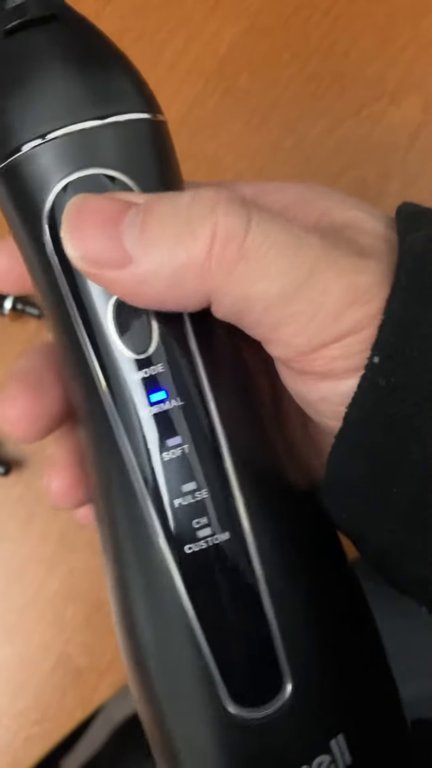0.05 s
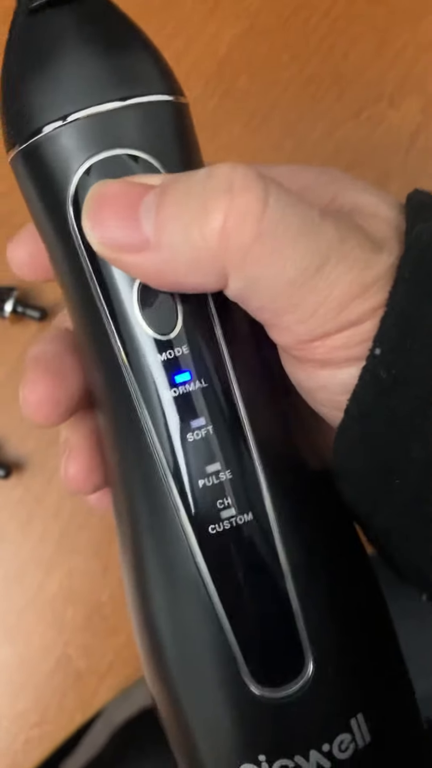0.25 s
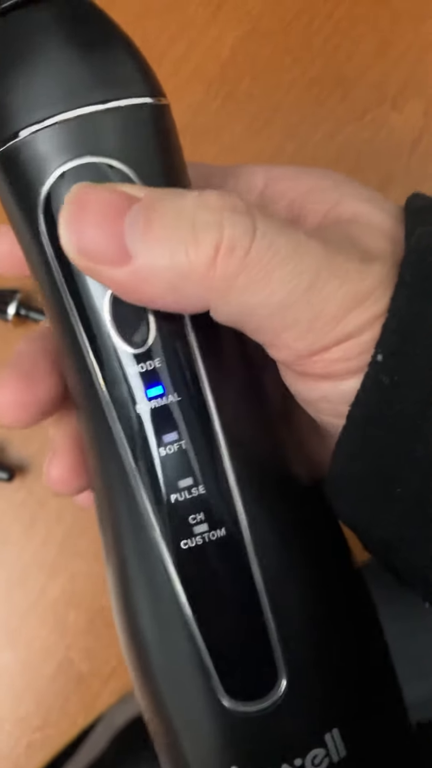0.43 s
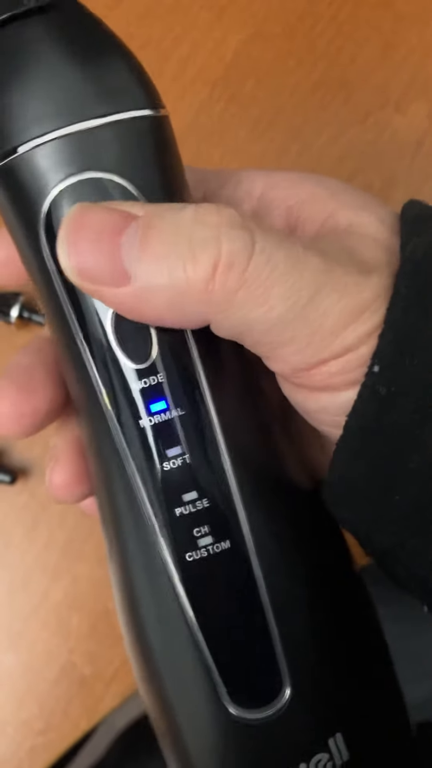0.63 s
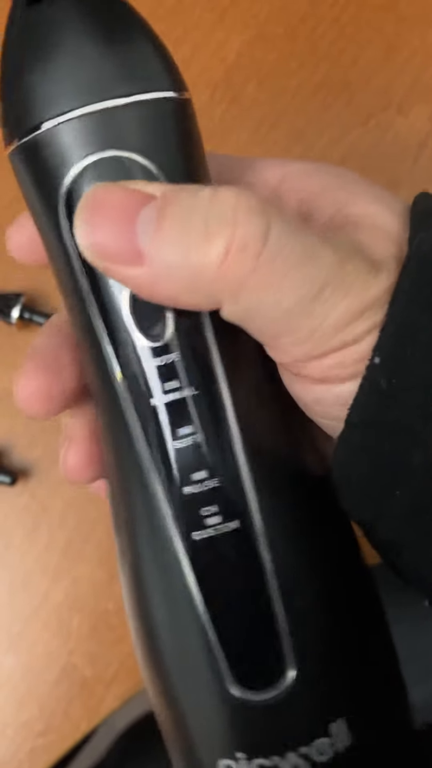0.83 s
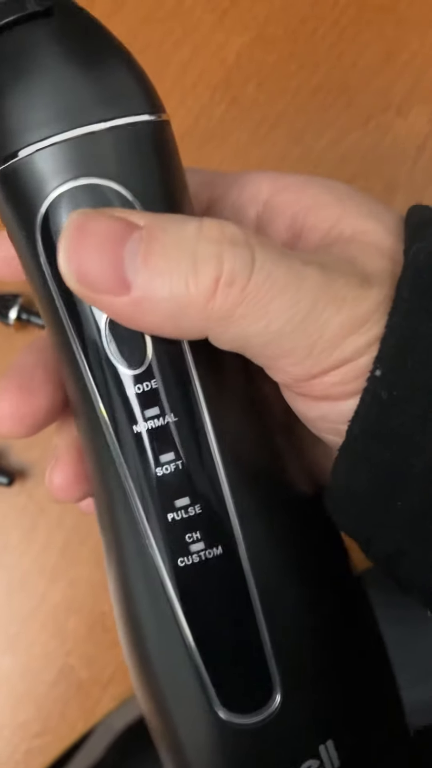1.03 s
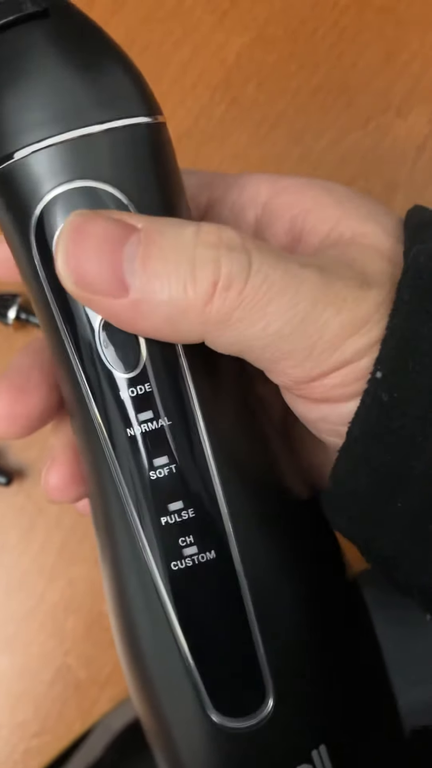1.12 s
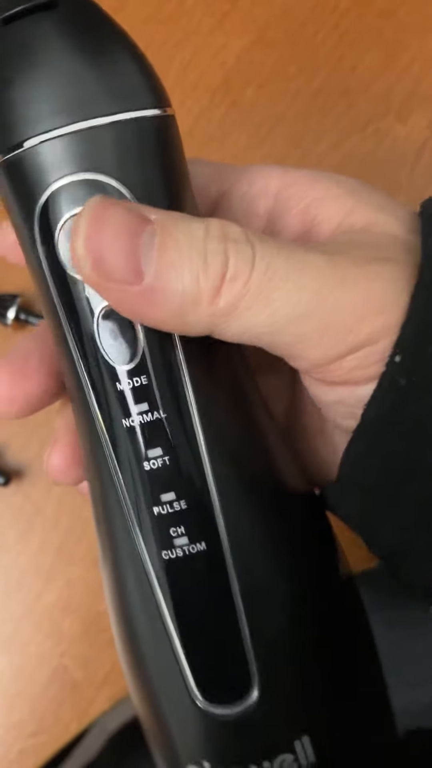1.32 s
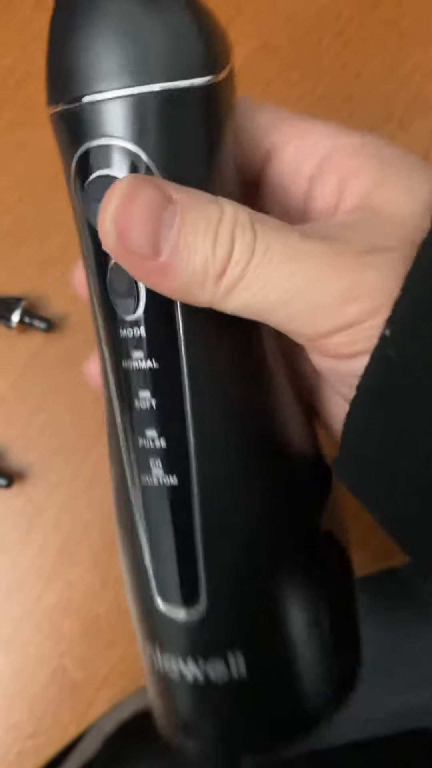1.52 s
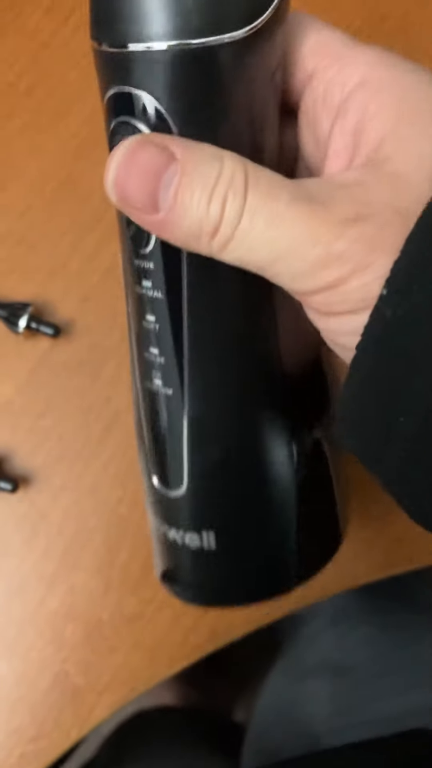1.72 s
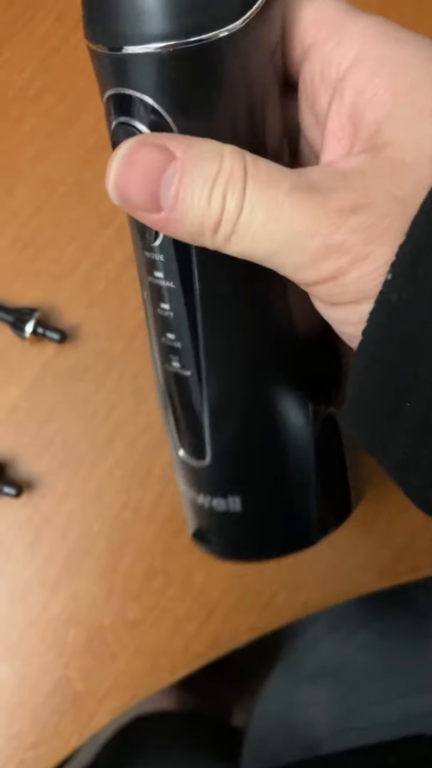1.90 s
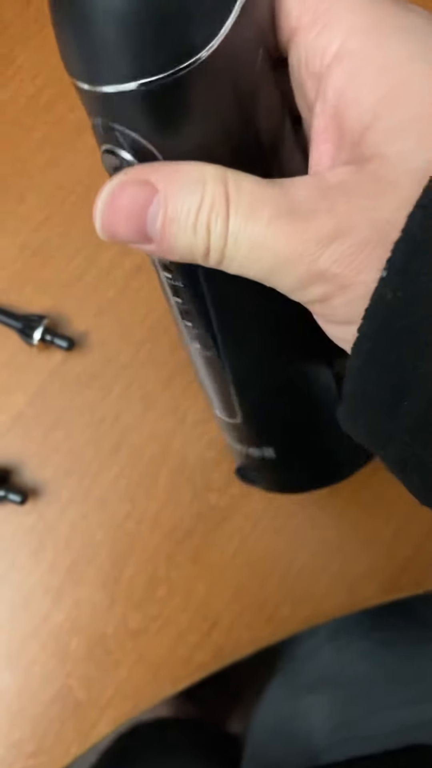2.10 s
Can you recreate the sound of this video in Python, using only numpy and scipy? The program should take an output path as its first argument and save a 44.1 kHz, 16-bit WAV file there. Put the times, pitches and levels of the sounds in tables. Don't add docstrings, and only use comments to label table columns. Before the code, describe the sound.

A handheld dental water jet runs dry close to the microphone: button clicks, an abrupt harsh gear rattle with a thin whine, a quick coast to rest, then low grip thumps in a quiet room.

```python
import sys
import numpy as np
from scipy import signal
from scipy.fft import rfft, irfft, next_fast_len
from scipy.io import wavfile
from scipy.ndimage import uniform_filter1d, map_coordinates

SR = 44100
rng = np.random.default_rng(int(sys.argv[2]) if len(sys.argv) > 2 else 0)


def master_out(mix):
    frames = np.transpose(np.atleast_2d(mix))
    ceiling = np.clip(frames, -1, 1)
    pcm = np.round(ceiling * 32767).astype(np.int16)
    wavfile.write(sys.argv[1], SR, pcm)


def volts(x):
    e = np.asarray(x, float) / 20
    return 10 ** e


N = 94815

SHAFT_HZ, OFF_S, ON_S = 154.9, 0.8, 0.215
PINION, CROWN = 10, 46

# frequency in Hz, lead of the left in radians.
DEVICE_LEAD = [(250, 0), (1000, -1.5), (2200, .7), (3600, -3), (4200, .5), (4750, 2.8), (5500, 3.3),
               (14800, 12.6)]
# frequency in Hz, left over right in dB.
DEVICE_PAN = [(300, -2.5), (700, -3.5), (1300, -4), (2400, -7.5), (2900, -1.5), (4400, 0), (5200, 2)]
# frequency in Hz, likeness from 0 to 1.
DEVICE_ALIKE = [(500, .95), (1400, .8), (2500, .68), (3500, .6), (4800, .9), (8500, .92), (10000, .75),
                (14000, .7)]


def unit(x):
    return x / np.sqrt(np.mean(x ** 2) + 1e-20)


def along(points, hz):
    f, v = np.transpose(points)
    return np.interp(np.log(hz + 1), np.log(f + 1), v)


def wobble(rate):
    return map_coordinates(rng.standard_normal(int(N * rate / SR) + 4), [np.arange(N) * rate / SR])


def filtered(x, response):
    m = next_fast_len(N + SR // 2)
    return irfft(rfft(x, m) * response(np.fft.rfftfreq(m, 1 / SR)), m)[..., :N]


def causal(gain_db):
    def response(hz):
        cepstrum = irfft(gain_db(hz) * np.log(10) / 20)
        half = len(cepstrum) // 2
        cepstrum[1:half] *= 2
        cepstrum[half + 1:] = 0
        return np.exp(rfft(cepstrum))
    return response


def ports(pair, lead, alike, pan):
    def response(hz):
        angle = np.arccos(np.clip(along(alike, hz), 0, 1)) / 2
        phase = np.interp(hz, *np.transpose(lead))
        gap = volts(along(pan, hz) / 2) * np.exp(0.5j * phase)
        left = [np.cos(angle) * gap, np.sin(angle) * gap]
        right = [np.cos(angle) / gap, -np.sin(angle) / gap]
        return np.array([left, right])
    return filtered(pair, response).sum(axis=1)


def breeze():
    # frequency in Hz, density in dB per Hz.
    air_tilt = [(25, -25.5), (60, -6.5), (200, -13), (700, -18.5), (830, -31), (1350, -18), (3000, -36),
                (15000, -49.5)]
    patch_db, level_db = 2.5, -64.5
    z = signal.stft(rng.standard_normal((2, N)), nperseg=512)[2]
    patches = uniform_filter1d(rng.standard_normal(z.shape[1:]), size=4, axis=0)
    patches = uniform_filter1d(patches, size=14, axis=1)
    noise = signal.istft(z * volts(patch_db * unit(patches)), nperseg=512)[1][:, :N]
    noise = unit(filtered(noise, lambda hz: volts(along(air_tilt, hz))))
    return noise * volts(level_db + 0.25 * wobble(4.8))


def hum():
    # frequency in Hz, rms level in dB.
    hum_tones = [(59.2, -63.5), (118.4, -76), (296.1, -70.5), (349.9, -66.5), (506.0, -78), (694.4, -75.5),
                 (1109, -85.5), (1324, -76.5)]
    sway_db, drift_rad = 3.5, 1.7
    t = np.arange(N) / SR
    out = np.zeros((2, N))
    for hz, db in hum_tones:
        sway = sway_db * np.array([wobble(12.12), wobble(22)])
        tone = np.sin(2 * np.pi * hz * t + drift_rad * wobble(5.96))
        out += np.sqrt(2) * volts(db + sway) * tone
    return out


def rustles():
    tilt = [(1500, -22), (3000, 10), (9000, 1.0), (11000, -1.5), (14000, -18.5)]  # Hz, dB
    t = np.arange(N) / SR
    hiss = filtered(rng.standard_normal((2, N)), lambda hz: volts(along(tilt, hz)))
    thumb = volts(-70) * np.exp(-0.5 * ((t - 0.18) / 0.02) ** 2)
    sleeve = volts(-82) * np.exp(-0.5 * ((t - 1.59) / 0.045) ** 2)
    return hiss * (thumb + sleeve)


def air():
    # frequency in Hz, lead of the left in radians.
    air_lead = [(300, 0), (950, -2.6), (3500, -3.3), (5500, -3.14), (8500, 0), (14900, 6.3)]
    # frequency in Hz, likeness from 0 to 1.
    air_alike = [(60, .97), (300, .85), (1400, .5), (3000, .6), (5500, .72), (12000, .55)]
    return ports(breeze() + hum() + rustles(), air_lead, air_alike, [(400, 1.0), (800, -1.4)])


def hand():
    # start in seconds, length in seconds, frequency in Hz, peak level in dB.
    thump_events = [(.955, .08, 126, -53), (1.112, .075, 127, -48), (1.225, .045, 124, -46),
                    (1.262, .068, 126, -36), (1.215, .05, 66, -52), (1.28, .07, 63, -47),
                    (1.15, .05, 64, -54), (1.878, .065, 124, -40), (1.88, .055, 72, -43),
                    (1.94, .06, 52, -44), (2.02, .05, 110, -56), (.13, .06, 68, -58)]
    stretch, skew, softness = 1.2, 0.8, 1.8
    scuff_db, scuff_hz, pan_db = -17, 260, 2.4
    t = np.arange(N) / SR
    thump = np.zeros(N)
    for start, length, hz, db in thump_events:
        progress = np.clip((t - start) / (length * stretch), 0, 1)
        swell = np.abs(np.sin(np.pi * progress ** skew)) ** softness
        thump += volts(db) * swell * np.sin(2 * np.pi * hz * (t - start))
    scuff = unit(filtered(rng.standard_normal((2, N)), lambda hz: hz / (1 + (hz / scuff_hz) ** 4)))
    loudness = np.sqrt(np.abs(uniform_filter1d(thump ** 2, size=900)))
    both = thump + volts(scuff_db) * scuff * loudness
    return both * volts([[pan_db / 2], [-pan_db / 2]])


def clicks():
    # time in seconds, peak level in dB, low body in dB, treble snap in dB.
    click_events = [(0.1572, -35, -3.5, -15), (0.1935, -39, -19, -20), (0.2174, -37, -17, -27),
                    (0.2248, -34, -15, -12.5), (0.2303, -27.5, -31.5, -2.5), (1.349, -57.5, -16, 10),
                    (1.5554, -74, 1, -16), (1.7904, -69, -10.5, 6), (1.823, -69, -8, 6.5),
                    (1.938, -53, -20, -20.5), (2.0567, -59, -11, -27)]
    # frequency in Hz, level in dB, 60 dB decay in seconds.
    button_modes = [(465, -6, 0.035), (865, -0.5, 0.035), (1230, -9, 0.012), (2160, -10, 0.011),
                    (3400, -13, .007), (4400, -10, 0.01), (7900, -5, .009), (8900, -5, 0.008)]
    crack_db, crack_t60_s, rise_s, crack_hz = -1, 0.01, 0.0012, 10500
    out = np.zeros((2, N + SR))
    t = np.arange(SR // 8) / SR
    for start, db, body_db, snap_db in click_events:
        tilt = [(700, body_db), (2500, 0), (8000, snap_db)]
        ring = np.zeros((2, len(t)))
        for hz, level, t60 in button_modes:
            mode_db = level + along(tilt, hz) + rng.normal(0, 0.57, (2, 1))
            ring += volts(mode_db - 60 * t / t60) * np.sin(2 * np.pi * hz * t)
        body = volts(body_db / 2) * uniform_filter1d(rng.standard_normal((2, len(t))), size=5)
        snap = volts(snap_db) * np.diff(rng.standard_normal((2, len(t) + 2)), 2) / 3
        crack = volts(crack_db - 60 * t / crack_t60_s) * (body + snap)
        click = ring * (1 - np.exp(-t / rise_s)) + crack
        out[:, round(start * SR):][:, :len(t)] += volts(db + 4.5) * click

    def band(hz):
        return 1 / (1 + (hz / crack_hz) ** 6) / (1 + (300 / (hz + 1)) ** 4)
    return ports(filtered(out[:, :N], band), DEVICE_LEAD, DEVICE_ALIKE, DEVICE_PAN)


def pump_load(turns):
    stroke_db, return_db, width = 0, 0.8, 0.11
    eccentric_db, wander_db = 2, 1.1
    crank = turns * PINION / CROWN

    def bump(at):
        return np.exp(-0.5 * (((crank - at + 0.5) % 1 - 0.5) / width) ** 2)
    tooth = (turns * PINION).astype(int) % PINION
    eccentric = eccentric_db * unit(rng.standard_normal(PINION))[tooth]
    strokes = stroke_db * bump(0.88) + return_db * bump(0.26)
    return volts(strokes + wander_db * wobble(71.16) + eccentric)


def tooth_knocks(turns):
    pinion_wear_db, crown_wear_db, scatter_db, cap = -5, -4, 4, 2.3
    tooth = np.arange(int(turns[-1] * PINION))
    at = np.interp(tooth, turns * PINION, np.arange(N)).astype(int)
    pinion_wear = volts(pinion_wear_db) * rng.standard_normal((2, PINION))[:, tooth % PINION]
    crown_wear = volts(crown_wear_db) * rng.standard_normal((2, CROWN))[:, tooth % CROWN]
    heavy = np.minimum(rng.exponential(1, 2000), cap)[tooth]
    sign = np.sign(rng.standard_normal((2, 2000)))[:, tooth]
    size = pinion_wear + crown_wear + unit(volts(scatter_db * heavy)) * sign
    knocks = np.array([np.bincount(at, row, N) for row in size])
    return knocks * np.sqrt(SR / (SHAFT_HZ * PINION))


def slams(t, level_db):
    # time in seconds, peak level in dB.
    slam_events = [(0.2299, -24), (0.2449, -27.5), (0.2536, -22), (0.2646, -26.5), (0.2719, -25),
                   (0.2872, -24.3), (0.293, -18), (0.3064, -27), (0.3229, -22), (0.3427, -20.5),
                   (0.3491, -17.5), (0.3622, -22.5), (0.3679, -26), (0.3815, -20.5), (0.4071, -25.5),
                   (0.4138, -27), (0.4227, -25), (0.4344, -30.5), (0.4423, -18), (0.4661, -23.5),
                   (0.4811, -20), (0.5005, -17.5), (0.5126, -25), (0.5301, -17), (0.5713, -23.5),
                   (0.5902, -18.5), (0.6013, -24.5), (0.6074, -22), (0.6157, -24), (0.6528, -25),
                   (0.658, -30), (0.681, -25.5), (0.6904, -33), (0.7087, -26), (0.7396, -21),
                   (0.746, -32.5), (0.771, -25.5), (0.7779, -21), (0.8001, -19), (0.8088, -29.5),
                   (0.8144, -32.5), (0.8335, -21), (0.8407, -30), (0.8532, -33.5), (0.8626, -26.5),
                   (0.8786, -29), (0.8865, -23), (0.8943, -28), (0.9254, -32), (0.9515, -31), (0.961, -25),
                   (0.9866, -38), (0.995, -29.5), (1.0065, -34), (1.0273, -39.5), (1.0394, -36.5),
                   (1.047, -45), (1.0574, -39), (1.065, -39), (1.0837, -49.5)]
    gain_db, decay_s, rise_s = 2.5, 0.0028, 0.0004
    out = np.zeros(N)
    for start, db in slam_events:
        shape = np.exp(-np.abs(t - start) / np.where(t > start, decay_s, rise_s))
        out += volts(db + gain_db - np.interp(start, t, level_db)) * shape
    return out


def rattle(t, turns, speed, level_db):
    # frequency in Hz, width in Hz, gain in dB.
    housing_modes = [(872, 110, 9), (1364, 53, 9), (1577, 105, 14.5), (1872, 300, 11), (2258, 220, 11),
                     (2659, 89, 12), (3092, 140, 11), (3482, 300, 11), (4700, 1000, 2), (5915, 1200, 1.5),
                     (6470, 21, 0.5), (7960, 110, 4), (8310, 190, -19), (9020, 810, 7)]
    # frequency in Hz, density in dB per Hz.
    shell_tilt = [(150, -28.5), (650, -20.5), (850, -7.5), (2000, -9), (2700, -15), (5300, -7.5),
                  (7200, -6.5), (10800, -22)]
    rub_db, trim_db, dull_hz = 0, 1, 11500
    slam_coast_db, slam_treble_db, slam_top_hz = 3, -6, 4800

    def slam_tone(hz):
        treble = volts(slam_treble_db)
        return treble + (1 - treble) / (1 + 1j * (hz / slam_top_hz) ** 2)

    def body_db(hz):
        modes = sum(db / (1 + (2 * (hz - centre) / width) ** 2) for centre, width, db in housing_modes)
        return along(shell_tilt, hz) + modes

    load = pump_load(turns)
    rub = rng.standard_normal((2, N))
    drive = (tooth_knocks(turns) + volts(rub_db) * rub) * load / load.mean() * speed ** 0.3
    slam_noise = np.sign(rub) * slams(t, level_db) * volts(-slam_coast_db * (1 - speed))
    drive = drive + filtered(slam_noise, slam_tone)
    colour = causal(body_db)
    scale = np.std(filtered(drive, colour)[:, :int(OFF_S * SR)])
    out = filtered(drive * volts(level_db + trim_db), colour) / scale
    return out - (1 - speed ** 0.77) * filtered(out, lambda hz: hz > dull_hz)


def whine(t, turns, speed, level_db):
    # shaft order, level in dB.
    whine_orders = [(1, -61), (2, -68.5), (3, -51.5), (7, -49), (8, -48.5), (9, -53.5), (10, -34.5),
                    (12, -45), (17, -46), (20, -53), (48, -49.5), (51, -52), (54, -59), (57, -56.5),
                    (59, -50.5), (60, -56), (61, -52.5), (62, -58)]
    spin_up_s, rise_s, sway_db, drift_rad = 0.009, 0.04, 3.2, 0.45
    since_on = np.maximum(t - ON_S, 0)
    spun = turns - SHAFT_HZ * spin_up_s * (1 - np.exp(-since_on / spin_up_s))
    out = np.zeros((2, N))
    for order, db in whine_orders:
        sway = sway_db * np.array([wobble(14), wobble(14)])
        drift = drift_rad * (1 + order / 60) * wobble(22)
        out += volts(db + sway) * np.sin(2 * np.pi * order * spun + drift)
    fade = volts(level_db - level_db.max()) * speed ** 4
    return out * fade * (1 - np.exp(-since_on / rise_s))


def motor():
    # time in seconds, level in dB.
    motor_level = [
        (0.212, -71),
        (0.231, -36.5),
        (0.271, -29.5),
        (0.585, -27.5),
        (0.891, -31.5),
        (0.901, -32),
        (0.947, -33),
        (1.059, -47.5),
        (1.13, -74),
    ]
    coast_s = 0.13
    t = np.arange(N) / SR
    level_db = np.interp(t, *np.transpose(motor_level), left=-120, right=-120)
    speed = np.exp(-np.maximum(t - OFF_S, 0) / coast_s)
    turns = np.cumsum(SHAFT_HZ * speed) / SR
    both = rattle(t, turns, speed, level_db) + whine(t, turns, speed, level_db)
    return ports(both, DEVICE_LEAD, DEVICE_ALIKE, DEVICE_PAN)


def room(x):
    t60_s = 0.16
    t = np.arange(SR // 3) / SR
    tail = rng.standard_normal((1, len(t))) * volts(-60 * t / t60_s) * (t > 0.004)
    return signal.fftconvolve(x, tail / np.linalg.norm(tail), axes=1)[:, :N]


def scene():
    device = motor() + clicks()
    return device + volts(-13) * room(device) + hand() + air()


def masked(x):
    # frequency in Hz, drop threshold in dB under the other.
    mask_depth = [(4300, -40), (4700, -8.5), (5700, -8.5), (6000, -11), (8500, -11), (11000, -3),
                  (12800, -1.5), (14000, -3)]
    sway_db, edge_hz, edge_sway_hz = 1.8, 15250, 500
    hz, _, z = signal.stft([x[0] + x[1], x[0] - x[1]], SR, nperseg=2048)
    count = z.shape[2]
    power = np.abs(uniform_filter1d(np.abs(z) ** 2, size=16, axis=1))
    sway = sway_db * np.repeat(rng.standard_normal(count), 2)[:count]
    threshold = volts(along(mask_depth, hz)[:, None] + sway) ** 2
    keep = power > power[::-1] * threshold
    edge = edge_hz + edge_sway_hz * np.repeat(rng.standard_normal(count), 3)[:count]
    keep &= hz[:, None] < edge
    mid, side = signal.istft(z * keep, nperseg=2048)[1][:, :N] / 2
    return np.array([mid + side, mid - side])


def top_cut(x):
    return signal.sosfilt(signal.butter(12, 16210, fs=SR, output="sos"), x)


def record(dry):
    mix = masked(filtered(dry, lambda hz: hz < 15850))
    return top_cut(mix)


dry = scene()
out = record(dry)
master_out(out)
```